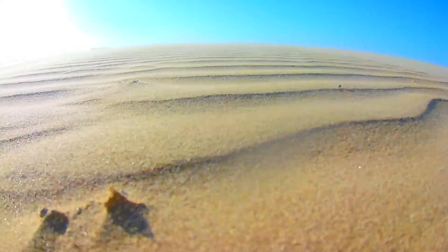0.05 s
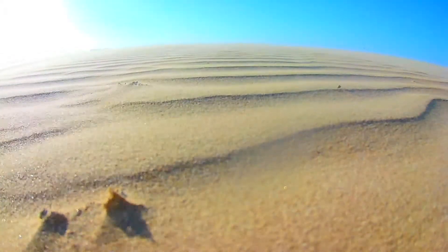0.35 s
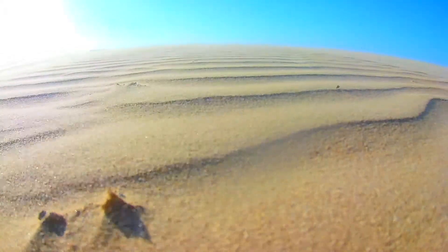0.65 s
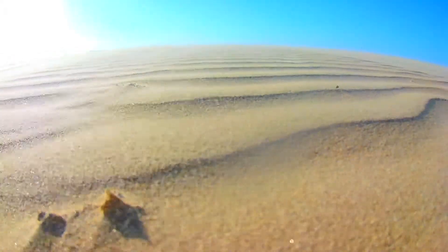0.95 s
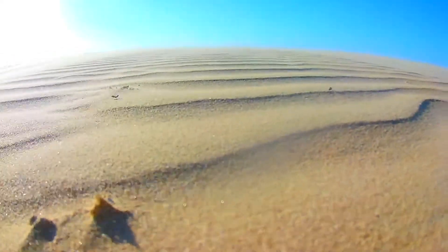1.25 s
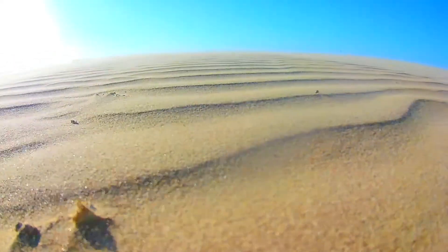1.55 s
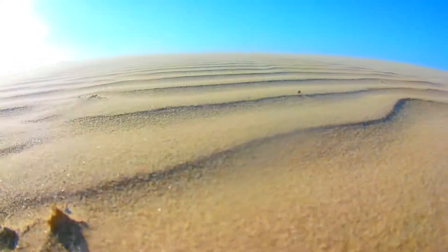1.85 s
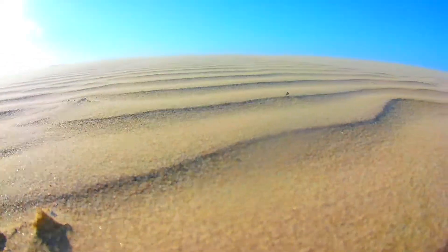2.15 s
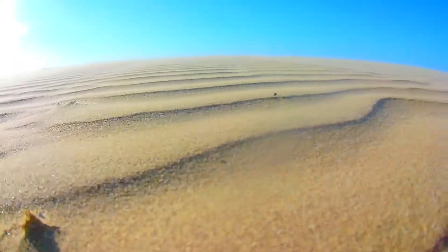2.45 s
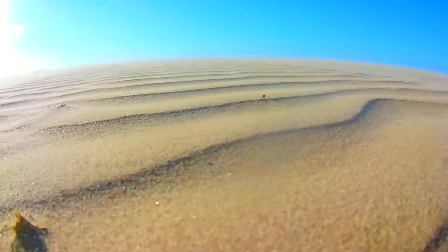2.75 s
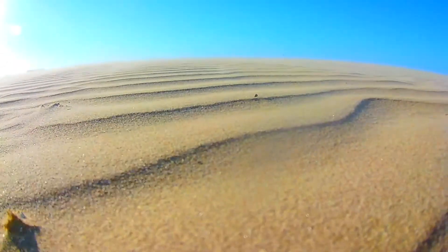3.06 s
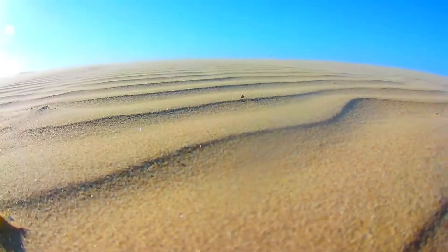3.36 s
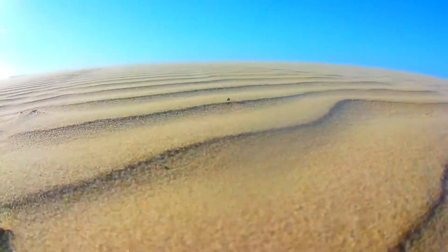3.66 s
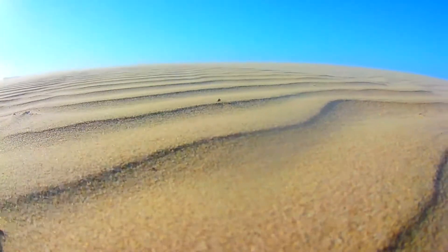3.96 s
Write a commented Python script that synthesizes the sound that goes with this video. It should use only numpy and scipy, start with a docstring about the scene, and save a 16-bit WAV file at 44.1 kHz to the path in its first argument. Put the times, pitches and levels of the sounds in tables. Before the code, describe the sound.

Gusty wind blows across an open dune and buffets a low microphone, swelling to a brief roar midway. Fine sand sprays the microphone in hissing waves, heavier grains tick, and drifting sand hisses softly further off.

```python
"""Sand, driven over an open dune by gusty wind, patters on a small camera just above the ground.
Countless fine grains colour the housing into a hiss, coarse ones ring it and a few heavy ones tick.
The air rushes through the hollows of the housing, roars in the strongest gust and buffets the
microphone. Further off, drifting sand hisses on through the lulls."""
import sys
import numpy as np
from scipy import signal
from scipy.fft import rfft, irfft, next_fast_len
from scipy.io import wavfile
from scipy.ndimage import uniform_filter1d, map_coordinates

SR = 44100
rng = np.random.default_rng(int(sys.argv[2]) if len(sys.argv) > 2 else 0)


def waveform_to_disk(signal):
    """Save audio, clipped to [-1, 1], as 16-bit WAV at the path in sys.argv[1]."""
    frames = np.transpose(np.atleast_2d(signal))
    scaled = np.clip(frames, -1, 1) * 32767
    samples = np.round(scaled).astype(np.int16)
    wavfile.write(sys.argv[1], SR, samples)


N = 176400

# tone of the housing when sand strikes it: f/Hz, level/dB
HOUSING_TONE = [(100, -13), (400, -23), (900, -7.5), (1300, -4), (1750, 2.5), (2200, -3), (2550, -2),
                (2780, -6), (3080, -3), (3550, -6), (3950, -3), (4450, -9), (5050, -0.5), (5400, -4.5),
                (5900, -8), (6900, -6.5), (7500, -16), (8600, -14), (9400, -15), (10000, -8.5), (11000, -9),
                (12400, -17), (13500, -19), (14400, -22.5)]
# housing modes that the larger grains ring: f/Hz, level/dB, t60/s
HOUSING_MODES = [(5210, 2, 0.0043), (10900, -4.5, 0.0017), (6340, -9.5, 0.0052), (3060, -6.5, 0.0033)]


def amp(db):
    """Decibels to gain."""
    return 10 ** (np.asarray(db) / 20)


def unit(x):
    """Scale to rms 1."""
    return x / np.sqrt(np.mean(x ** 2) + 1e-20)


def along(points, hz):
    """Read (f/Hz, value) points on a log frequency axis."""
    f, v = np.transpose(points)
    return np.interp(np.log(hz + 1), np.log(f + 1), v)


def curve(rows):
    """An envelope through (t/s, value) rows."""
    return np.interp(np.arange(N) / SR, *np.transpose(rows))


def wobble(rate):
    """A smooth random curve, rate knots a second."""
    return map_coordinates(rng.standard_normal(int(N * rate / SR) + 4), [np.arange(N) * rate / SR])


def filtered(x, response):
    """Filter x with a complex frequency response."""
    size = next_fast_len(N + SR // 2)
    return irfft(rfft(x, size) * response(np.fft.rfftfreq(size, 1 / SR)), size)[:N]


def patchy_noise(patchy_db):
    """White noise whose level flickers in patches of time and frequency."""
    spectra = signal.stft(rng.standard_normal(N), nperseg=512)[2]
    patches = uniform_filter1d(rng.standard_normal(spectra.shape), size=4, axis=0)
    patches = uniform_filter1d(patches, size=12, axis=1)
    return signal.istft(spectra * amp(patchy_db * unit(patches)), nperseg=512)[1][:N]


def coloured(spectrum, patchy_db):
    """Patchy noise of rms 1 with the given spectrum."""
    return unit(filtered(patchy_noise(patchy_db), lambda hz: amp(along(spectrum, hz))))


def impulse(spectrum, size=2048):
    """A minimum-phase click with the given spectrum."""
    cepstrum = irfft(np.log(amp(along(spectrum, np.fft.rfftfreq(size, 1 / SR)))))
    cepstrum[1:size // 2] *= 2
    cepstrum[size // 2 + 1:] = 0
    return irfft(np.exp(rfft(cepstrum)))


def impacts(density, per_s, spread_db):
    """Random hits of scattered size, made softer where they fall denser to even out the power."""
    sizes = amp(spread_db * np.minimum(rng.standard_normal(N), 2.6)) * rng.choice([-1, 1], N)
    return sizes * (rng.random(N) < per_s / SR * density) / np.sqrt(density)


def sand():
    """Fine grains patter on the housing, coarse ones ring it; more flow brings more and harder hits."""
    # sand arriving at the housing: t/s, level/dB
    sand_flow = [(0, -50.5), (.07, -46.5), (.29, -50.5), (.39, -49.5), (.45, -50), (.5, -58), (.535, -46.5),
                 (.7, -51), (.81, -49), (.87, -44.5), (.91, -48.5), (.99, -44), (1.11, -48), (1.16, -53.5),
                 (1.23, -62), (1.375, -61), (1.41, -53), (1.52, -50), (1.6, -50.5), (1.72, -59),
                 (1.79, -45), (1.93, -50.5), (1.98, -57), (2.02, -51.5), (2.23, -44.5), (2.38, -50.5),
                 (2.5, -48), (2.63, -53.5), (2.72, -50.5), (2.77, -55.5), (2.86, -48), (2.96, -51),
                 (3.07, -58.5), (3.38, -58.5), (3.47, -47.5), (3.64, -46.5), (4, -51.5)]
    flow_db = curve(sand_flow)
    swell = amp(flow_db - flow_db.mean() + wobble(45))
    density = swell ** 1.2  # 60 % of a swell in dB comes from more grains
    fine_hits = impacts(density, per_s=12000, spread_db=7)
    fine = unit(signal.fftconvolve(fine_hits, impulse(HOUSING_TONE))[:N])
    coarse_hits = impacts(np.sqrt(density), per_s=220, spread_db=3)
    t = np.arange(SR // 50) / SR
    coarse = np.zeros(N)
    for hz, db, t60 in HOUSING_MODES:
        ring = np.sin(2 * np.pi * hz * t) * amp(-60 * t / t60) * (1 - np.exp(-t / 0.00026))
        spot = np.cos(2 * np.pi * rng.random(N))  # each spot on the housing excites the mode differently
        coarse += amp(db) * unit(signal.fftconvolve(coarse_hits * spot, ring)[:N])
    return amp(flow_db.mean() + 6.5) * swell * (fine + amp(-7) * unit(coarse))


def distant_drift():
    """Sand drifting further off across the dune lays a soft bed of hiss under the lulls."""
    # tone of the far hiss: f/Hz, level/dB
    hiss_tone = [(300, -0.5), (1500, 3.5), (2500, 4), (4000, -2.5), (7000, -8), (11000, -14), (14400, -12)]
    return amp(-53 + wobble(4.7)) * coloured(hiss_tone, patchy_db=5.5)


def hollow(centre_hz, width_hz):
    """Air rings in one hollow: a steep-sided band of noise at rms 1."""
    band = lambda f: (1j * f * width_hz / (centre_hz ** 2 - f * f + 1j * f * width_hz)) ** 2
    return unit(filtered(patchy_noise(patchy_db=1.0), band))


def wind():
    """Air rushes over the housing and sounds its hollows; the lowest come forward in the gusts."""
    # air flowing over the housing: t/s, level/dB
    airflow = [(0, -46), (.08, -40), (.18, -44.5), (.31, -48), (.46, -41.5), (.5, -41), (.53, -43),
               (.72, -45.5), (.87, -46.5), (.92, -52), (1, -39.5), (1.05, -43.5), (1.14, -33),
               (1.23, -50.5), (1.29, -40), (1.37, -46), (1.6, -39.5), (1.71, -37.5), (1.82, -32),
               (1.92, -41.5), (2, -34.5), (2.1, -41.5), (2.27, -34.5), (2.38, -40.5), (2.44, -32.5),
               (2.52, -33.5), (2.79, -40.5), (2.91, -35.5), (2.98, -38), (3.05, -47), (3.11, -37),
               (3.42, -34), (3.83, -34), (3.91, -38.5), (4, -49.5)]
    # hollows of the housing: f/Hz, width/Hz, level/dB, growth/(dB per dB of airflow)
    cavities = [(698, 223, -9.5, 1.24), (1235, 220, -5.5, 1.14), (1471, 285, -0.5, 0.94),
                (1865, 340, -15.5, 1.15), (3070, 540, -14.5, 1), (3955, 340, -19, 1.17)]
    # tone of the broad rush: f/Hz, level/dB
    rush_tone = [(200, -4.5), (600, -5), (1000, 1), (1600, -1), (2200, -12), (3500, -26), (6000, -23),
                 (8000, -72), (11000, -71), (14500, -34)]
    nominal_db = -38
    gust_db = curve(airflow) - nominal_db + 0.87 * wobble(90)
    hollows = sum(amp(db + growth * gust_db) * hollow(hz, width) for hz, width, db, growth in cavities)
    rush = amp(gust_db - 8.5) * coloured(rush_tone, patchy_db=0.45)
    return amp(nominal_db) * (amp(-4.5) * hollows + rush)


def roar():
    """Turbulence adds a low, fluttering roar that peaks in the strongest gust."""
    # strength of the turbulence: t/s, level/dB
    turbulence = [(0, -59), (.16, -47.5), (.25, -52.5), (1.16, -52.5), (1.24, -53.5), (1.4, -42),
                  (1.5, -55.5), (1.65, -48), (1.8, -34), (1.92, -43.5), (2.22, -38.5), (2.36, -48),
                  (2.45, -44), (2.78, -57), (3.01, -51), (3.3, -56), (3.76, -45), (4, -54)]
    # tone of the roar: f/Hz, level/dB
    roar_tone = [(60, -7), (160, -3.5), (300, -3), (480, -3.5), (800, -1.5), (1200, -21.5), (2500, -16),
                 (6000, -57)]
    return amp(curve(turbulence) - 2 + 2.24 * wobble(90)) * coloured(roar_tone, patchy_db=0.9)


def buffet():
    """Lumpy pressure rumbles at the microphone, with a sharp suction when an eddy passes."""
    # wind pressing on the microphone: t/s, level/dB
    buffeting = [(0, -39), (.07, -35), (.25, -42.5), (.42, -37), (.53, -32.5), (.7, -42.5), (.9, -40.5),
                 (1.01, -38), (1.17, -38.5), (1.24, -41.5), (1.45, -37.5), (1.6, -38), (1.8, -31),
                 (1.93, -40), (2.02, -33), (2.23, -36), (2.31, -41), (2.42, -35.5), (2.85, -37), (3.3, -38),
                 (3.5, -35), (3.88, -39), (4, -34.5)]
    # tone of the rumble: f/Hz, level/dB
    rumble_tone = [(6, -9.5), (16, 2), (45, 0), (70, -5), (110, -10), (170, -14), (280, -23), (600, -39),
                   (2000, -80)]
    # eddies that thump the microphone: t/s, peak level/dB, half length/s
    eddies = [(0.462, -35, 0.0011), (0.484, -23, .0011), (1.3465, -30, .0019), (1.435, -26, 0.0028),
              (1.517, -40, .003), (1.644, -30, 0.0024)]
    lumps = amp(1.8 * wobble(22.07))
    rumble = unit(lumps * coloured(rumble_tone, patchy_db=0.5))
    pressure = amp(curve(buffeting) - 0.5) * rumble
    for centre_s, db, half_s in eddies:
        u = (np.arange(N) / SR - centre_s) / half_s
        pressure -= amp(db) * (1 - .5 * u ** 2) * np.exp(-.5 * u ** 2)
    return pressure


def heavy_grains():
    """A large grain cracks on the housing and rings its modes, each time in a slightly different mix."""
    # heavy grains landing: t/s, peak level/dB
    landings = [(.0413, -27), (.0492, -26.5), (.2902, -30.5), (.4663, -29), (.5376, -29), (.7502, -32),
                (.9897, -19), (1.0675, -26), (1.4023, -27.5), (1.4322, -33), (1.5045, -31), (1.6161, -29),
                (1.756, -28), (1.818, -27.5), (1.8986, -29.5), (2.1318, -26.5), (2.158, -25), (2.2179, -24),
                (2.2292, -26), (2.4272, -23.5), (2.5011, -27.5), (2.5692, -27.5), (2.6753, -30.5),
                (2.726, -31.5), (2.8365, -29.5), (3.0051, -32.5), (3.84, -26)]
    scatter_db, detune, crack_gain = 0.5, 0.017, .55
    crack = impulse(HOUSING_TONE)
    t = np.arange(len(crack)) / SR
    out = np.zeros(N + len(t))
    for start_s, peak_db in landings:
        ring = np.zeros(len(t))
        for hz, db, t60 in HOUSING_MODES:
            decay = amp(db + scatter_db * rng.standard_normal() - 60 * t / t60)
            pitch_hz = hz * (1 + detune * rng.standard_normal())
            ring += decay * np.sin(2 * np.pi * pitch_hz * t)
        ring *= 1 - np.exp(-t / 0.0002)  # attack
        tick = ring / np.abs(ring).max() + crack_gain * crack / np.abs(crack).max()
        out[round(start_s * SR):][:len(t)] += amp(peak_db) * tick / np.abs(tick).max()
    return out[:N]


def scene():
    """Sand and wind at one microphone."""
    return (sand() + heavy_grains() + distant_drift() + wind() + roar() + buffet())[None]


def record(dry):
    """The microphone port notches the treble, and the camera keeps nothing above its band limit."""
    # notches of the port: f/Hz, width/Hz, depth (0-1)
    port_notches = [(7950, 1050, .94), (13400, 800, .78)]
    top_hz = 14480

    def response(f):
        notches = [1 - depth * 1j * f * width / (hz * hz - f * f + 1j * f * width)
                   for hz, width, depth in port_notches]
        return np.prod(notches, axis=0) * (f < top_hz)

    return filtered(dry[0], response)[None]


dry = scene()
out = record(dry)
waveform_to_disk(out)
```